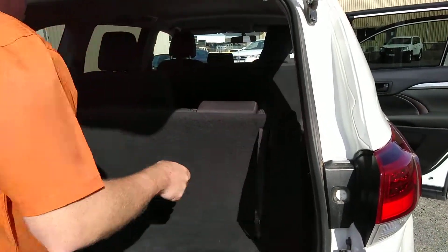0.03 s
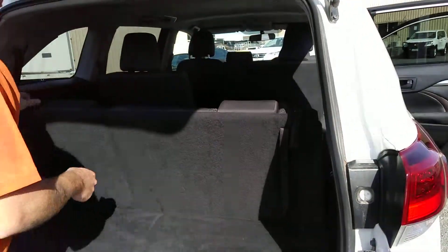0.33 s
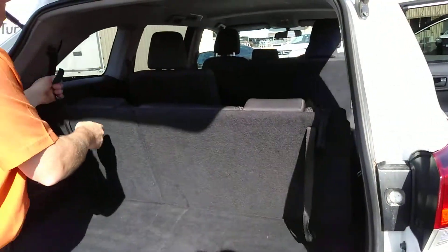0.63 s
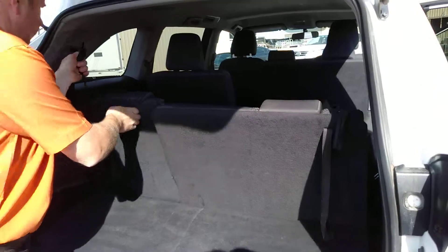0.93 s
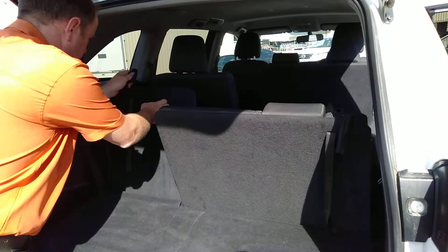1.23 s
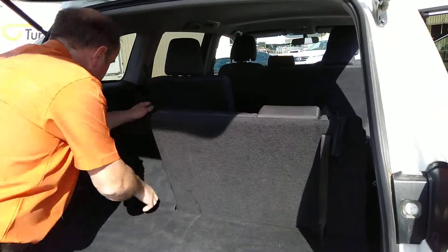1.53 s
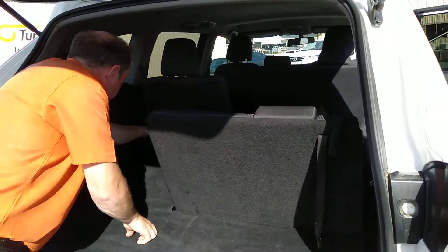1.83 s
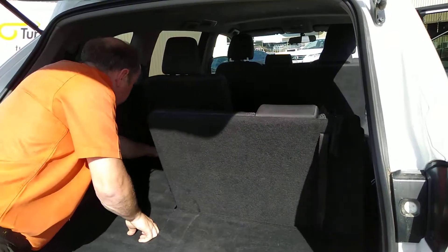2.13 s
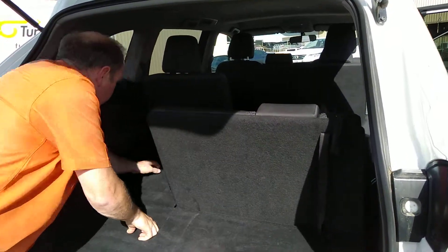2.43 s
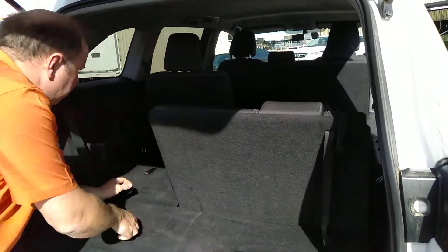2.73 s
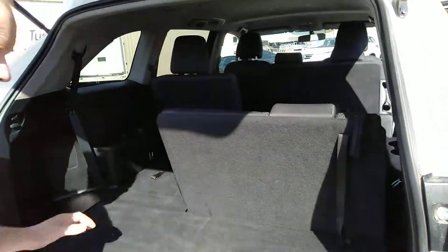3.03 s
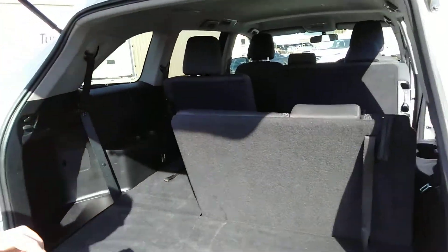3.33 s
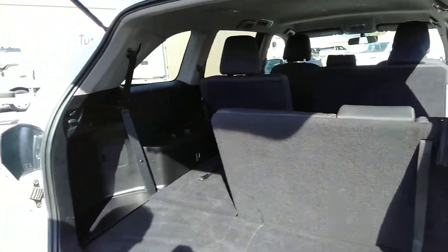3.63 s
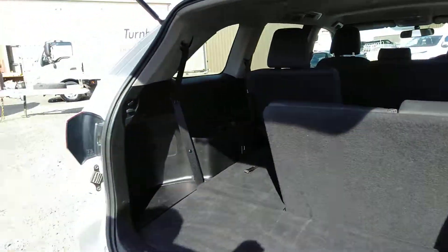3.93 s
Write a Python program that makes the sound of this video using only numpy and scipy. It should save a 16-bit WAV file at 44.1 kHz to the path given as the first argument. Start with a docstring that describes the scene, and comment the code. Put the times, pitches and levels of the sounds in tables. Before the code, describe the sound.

A folding car seat latches with one loud, close clunk about halfway through. Light plastic clicks come before and after, then soft rustles, a short scrape and a small rattle, over a faint distant idling engine and light wind.

```python
"""In the open back of a car parked outdoors, a folding seat latches with one loud clunk.
The catch touches, then clatters home: its impacts excite the modes of the seat frame, the padded
backrest thumps and the cabin reverberates briefly. Trim clicks and scrapes, cloth rustles and a
loose fitting rattles, over a distant idling engine and light wind."""
import sys
import numpy as np
from scipy import signal
from scipy.fft import rfft, irfft
from scipy.io import wavfile

SR = 44100
rng = np.random.default_rng(int(sys.argv[2]) if len(sys.argv) > 2 else 0)


def dump_mix(stems):
    """Bounce the given channels to the path in sys.argv[1] as a 16-bit WAV at rate SR."""
    frames = np.atleast_2d(stems).T  # one column per channel
    limited = np.clip(frames, -1, 1)  # hard clip at full scale
    pcm = np.round(limited * 32767).astype(np.int16)
    wavfile.write(sys.argv[1], SR, pcm)


N = 176400
PIVOT_HZ = 2000  # spectral tilts turn about this frequency
# Spectrum of rough contact. Each row: frequency in Hz, relative level in dB.
CONTACT_SPECTRUM = [(150, -10), (600, -0.5), (1500, 3.5), (2500, 3), (4800, -12.5), (7300, -6.5),
                    (10000, -24.5), (16000, -15)]


def amp(db):
    """Decibels as an amplitude ratio."""
    return 10 ** (np.asarray(db) / 20)


def unit(x):
    """Normalisation to unit RMS."""
    return x / np.sqrt(np.mean(x ** 2) + 1e-20)


def read(points, hz):
    """Interpolation along a logarithmic frequency axis."""
    f, value = np.transpose(points)
    return np.interp(np.log(hz + 1), np.log(f + 1), value)


def add(mix, start, sound):
    """Superposition of a sound on the mix, from a start in seconds."""
    part = mix[max(round(start * SR), 0):][:len(sound)]
    part += sound[:len(part)]


def fade(t, t60):
    """Exponential decay, by 60 dB in t60 seconds."""
    return np.exp(-np.log(1000) * t / t60)


def bell(offset, width):
    """A Gaussian curve; the width is its standard deviation."""
    return np.exp(-(offset / width) ** 2 / 2)


def colour(x, points, tilt=0):
    """Minimum-phase filtering at unit energy, tilted in dB per octave above 1400 Hz."""
    size = 4096
    hz = abs(np.fft.fftfreq(size, 1 / SR))
    gain = unit(amp(read(points, hz) + tilt * np.log2(np.maximum(hz, 1400) / PIVOT_HZ)))
    log_response = signal.hilbert(np.log(gain + 1e-6)).conj()
    taps = np.fft.ifft(np.exp(log_response)).real
    return signal.fftconvolve(x, taps[:size // 2])[:len(x)]


def resonant(points, centre_hz, low_cut, peak_db=5.5):
    """A broad resonance laid over a spectrum, with a cut in dB per octave below its centre."""
    hz = np.geomspace(50, SR / 2, 120)
    octaves = np.log2(hz / centre_hz)
    peak = peak_db * bell(octaves, width=0.44)
    return np.c_[hz, read(points, hz) + peak + low_cut * np.minimum(octaves, 0)]


def drift(rate_hz):
    """Random motion: low-passed noise of unit RMS."""
    hz = np.fft.rfftfreq(N, 1 / SR)
    return unit(irfft(rfft(rng.standard_normal(N)) / (1 + (hz / rate_hz) ** 4), N))


def burst(decay_s):
    """An impact's broadband transient: decaying noise of unit energy."""
    t = np.arange(SR // 4) / SR
    x = rng.standard_normal(len(t)) * fade(t, decay_s)
    for _ in range(2):
        whitened = irfft(np.exp(1j * np.angle(rfft(x))), len(t))
        x = whitened * fade(t, 2 * decay_s)
    return x / np.linalg.norm(x)


def wavering(hz, rate_hz=2.71, depth_db=2, deviation_hz=1.525):
    """A tone of unit RMS under random amplitude and frequency modulation."""
    strength = amp(depth_db * drift(rate_hz))
    pitch = hz + deviation_hz * drift(rate_hz)
    return unit(strength * np.sin(2 * np.pi * np.cumsum(pitch) / SR))


def outdoors(split_hz=250):
    """Broadband ambient noise, with the low pressure fluctuations of wind puffs."""
    # Each row: frequency in Hz, relative spectral density in dB.
    spectrum = [(12, -53), (20, -7), (49, -9.5), (88, -0.5), (145, -10.5), (167, -16), (221, -17),
                (355, -24.5), (456, -21), (554, -26), (603, -27), (843, -26), (916, -23), (1080, -26.5),
                (2000, -29), (4760, -46), (7030, -43), (9040, -51), (15800, -47)]
    # Each row: time in seconds, gain above the bass in dB.
    swell = [(0, -.5), (.8, 2), (1.4, 0.94), (2, -.5), (2.8, -0.5), (3.5, -0.5), (4, 1)]
    # Each row: middle in seconds, width in seconds, level in dB.
    puffs = [(0.03, .05, -52), (1.007, 0.069, -45), (1.44, 0.0079, -36), (1.52, 0.054, -53),
             (2.307, 0.14, -56)]
    t, hz = np.arange(N) / SR, np.fft.rfftfreq(N, 1 / SR)
    air = unit(irfft(rfft(rng.standard_normal(N)) * amp(read(spectrum, hz)), N))
    bass = irfft(rfft(air) * (hz < split_hz), N)
    hiss = (air - bass) * amp(np.interp(t, *np.transpose(swell)))
    wind = drift(rate_hz=60) * sum(amp(db) * bell(t - middle, width) for middle, width, db in puffs)
    return amp(-50.5) * (bass + hiss) + wind


def engine(fan_hz=936):
    """Rotation gives a line spectrum: a distant idling engine hums and its fan's whine comes and goes."""
    # Each row: frequency in Hz, level in dB.
    hum_lines = [(70, -63.5), (82, -59.5), (94, -55), (123, -60.5), (140, -61), (233, -69.5),
                 (398.4, -71.5), (467, -68.5), (598, -72.5), (699, -75.5), (907, -74.5), (945, -74.5),
                 (1005, -81.5)]
    # Each row: time in seconds, level in dB.
    whine_levels = [(0, -65), (.8, -69), (1.7, -72.5), (1.9, -62), (2.15, -68), (3.2, -68.5), (4, -64.5)]
    hum = sum(amp(db) * wavering(hz) for hz, db in hum_lines)
    whine_db = np.interp(np.arange(N) / SR, *np.transpose(whine_levels))
    return hum + amp(whine_db) * wavering(fan_hz)


def scuffs(grains_per_s=3200):
    """Sliding friction: swells of tiny random impulses merge into scuffs and cloth rustles."""
    # Each row: middle in seconds, width in seconds, level in dB, tilt in dB per octave, resonance in Hz.
    rubs = [(0.194, 0.0044, -53, 0, 3200), (0.394, 0.0092, -56.5, -1.5, 5500), (0.798, 0.04, -65, 4, 6100),
            (0.706, 0.061, -72, 8, 2180), (1.72, 0.016, -67, 6, 7060), (2.193, 0.0085, -53, -3.5, 1200),
            (3.194, 0.023, -50.5, 1, 1940), (3.265, 0.027, -58, -0.5, 1400), (3.325, 0.011, -56.5, 2, 4560),
            (3.751, 0.035, -54.5, -4, 3300), (3.821, 0.015, -57, -1, 3020), (3.886, 0.022, -62, -1, 3400),
            (3.930, 0.0034, -50.5, 2.5, 7200), (3.948, 0.019, -58, -1.5, 4500)]
    t, out = np.arange(N) / SR, np.zeros(N)
    for middle, width, db, tilt, hz in rubs:
        grains = rng.standard_normal(N) * (rng.random(N) < grains_per_s / SR)
        grains *= amp(-0.5 * np.minimum(rng.exponential(1, N), 3))
        spectrum = resonant(CONTACT_SPECTRUM, hz, low_cut=-0.5)
        out += amp(db) * colour(unit(grains) * bell(t - middle, width), spectrum, tilt)
    return out


def scrape(catches_per_s=1100, spread_db=4, release_s=.001):
    """Stick-slip friction: uneven catches of the trim drive the resonances of a plastic panel."""
    # Each row: start in seconds, length in seconds, level in dB.
    slips = [(3.7605, 0.0028, -41.5), (3.7745, 0.016, -47), (3.806, 0.011, -55)]
    # Each row: frequency in Hz, bandwidth in Hz, relative level in dB.
    panel_modes = [(1150, 270, 0), (1600, 260, 4.5), (2190, 380, 4), (3200, 1200, -16)]
    t, out = np.arange(SR // 8) / SR, np.zeros(N)
    for start, length, db in slips:
        travel = np.cumsum(rng.exponential(1, len(t)) ** 2 / 2) * catches_per_s / SR
        catches = np.diff(np.floor(travel), prepend=-1)
        catches *= amp(spread_db * rng.uniform(-0.9, 1, len(t))) * rng.choice([-1, 1], len(t))
        catches *= np.clip((length - t) / release_s, 0, 1)
        ring = np.zeros(len(t))
        for hz, width, level in panel_modes:
            band = signal.butter(2, [hz - width / 2, hz + width / 2], "band", fs=SR)
            ring += amp(level) * signal.lfilter(*band, catches)
        add(out, start, amp(db) * np.sqrt(length * SR) * ring / np.linalg.norm(ring))
    return out


def rattle():
    """Repeated impact: each bounce of a loose fitting knocks and excites its damped modes."""
    # Each row: start in seconds, gain in dB.
    bounces = [(3.927, -2.5), (3.9315, -10), (3.9392, 3), (3.948, -2), (3.953, -8)]
    # Each row: frequency in Hz, level in dB, T60 in seconds.
    fitting_modes = [(750, -51, .04), (930, -51, .03), (1640, -50, .035), (3130, -48.5, .04),
                     (4390, -56, .05), (6650, -62, .04), (6990, -60, .04), (7600, -62, .04)]
    t, out = np.arange(SR // 4) / SR, np.zeros(N)
    for start, db in bounces:
        ring = sum(amp(level) * fade(t, t60) * np.sin(2 * np.pi * (hz * t + rng.random()))
                   for hz, level, t60 in fitting_modes)
        knock = amp(-25.5) * colour(burst(decay_s=.022), CONTACT_SPECTRUM, tilt=-3)
        add(out, start, amp(db) * (ring + knock))
    return out


def clicks():
    """Impulse response of plastic trim: a sharp tick and a short, heavily damped ring."""
    # Each row: start in seconds, level in dB, tilt in dB per octave, resonance in Hz,
    # ring relative to the tick in dB, cut below the resonance in dB per octave.
    taps = [(0.1735, -16.5, -1, 3230, -8, 3.5), (.3415, -28, 6, 1600, -6, -1.5),
            (0.656, -27.5, 0, 2340, 0, 6), (0.668, -34.5, 1.5, 1900, 7, -3), (0.7208, -37, -6, 2000, 7, 5),
            (1.055, -36.5, 3, 1700, 5, -2.5), (1.415, -36, 1, 2500, -1, -1), (1.452, -44.5, 4, 7200, 5, 7),
            (1.808, -41, 11, 3000, -4, 1), (2.1984, -25, -8, 1200, 2, 6), (2.513, -35.5, -1, 3000, -9, 8),
            (2.5762, -37, -1, 3020, -1, 7), (2.616, -41, 6, 3500, -8, 7), (2.744, -37.5, 0, 2600, 3, -1),
            (2.902, -28.5, 3, 2000, -3.5, -1.5), (2.943, -40.5, 19, 14000, -1, -6),
            (3.1072, -26.5, -5, 1550, -8, -0.5), (3.2028, -20, -10, 1870, 1.5, 2),
            (3.2073, -22, -9, 940, 3, 2), (3.2643, -25, -5.5, 1390, -1, 0),
            (3.3122, -26.5, -4, 1380, -3, 4), (3.356, -30.5, -6, 2040, -1, 1),
            (3.891, -29, -7, 2570, -1, 4.5)]
    # Each row: frequency in Hz, relative level in dB.
    trim_spectrum = [(150, 1.5), (600, 7), (1500, 3.5), (2800, 3), (4800, -9.5), (7200, -9.5),
                     (10000, -23.5), (16000, -47)]
    out = np.zeros(N)
    for start, db, tilt, hz, ring_db, low_cut in taps:
        tick = burst(decay_s=.0026) + amp(ring_db) * burst(decay_s=.036)
        add(out, start, amp(db) * colour(tick, resonant(trim_spectrum, hz, low_cut), tilt))
    return out


def cabin(x, build_up_s=.0084, gain_db=-12.5):
    """Reverberation: reflections build up and are soon absorbed by the padded interior."""
    # Each row: frequency in Hz, T60 in seconds.
    reverb_times = [(150, 0.35), (500, 0.11), (900, .07), (1800, 0.13), (7000, 0.1), (15000, 0.06)]
    hz, t, noise = signal.stft(rng.standard_normal(SR // 2), SR, nperseg=256)
    tail = signal.istft(noise * fade(t, read(reverb_times, hz)[:, None]), SR)[1]
    tail *= np.minimum(np.arange(len(tail)) / SR / build_up_s, 1) ** 2
    return amp(gain_db) * signal.fftconvolve(x, tail / np.linalg.norm(tail))[:N]


def backrest(rise_s=.008):
    """Cushioned impact: low resonances of the padded backrest swell and die."""
    # Each row: start in seconds, frequency in Hz, level in dB, T60 in seconds.
    thumps = [(2.190, 140, -44, .1), (2.2320, 228, -36.5, .11), (2.2410, 108, -36, .09),
              (2.2440, 180, -35.5, .11), (2.367, 85, -35, .03)]
    t, out = np.arange(SR // 2) / SR, np.zeros(N)
    for start, hz, db, t60 in thumps:
        envelope = np.minimum(t / rise_s, 1) * fade(np.maximum(t - rise_s, 0), t60)
        add(out, start, amp(db) * envelope * np.sin(2 * np.pi * hz * t))
    return out


def latch(crack_db=-7.3):
    """Modal excitation: each blow of the catch cracks and adds energy to the ringing frame and catch."""
    # Each row: start in seconds, gain in dB, tilt in dB per octave.
    blows = [(2.1925, -25, -5), (2.1983, -19, -6), (2.2337, -5, 0), (2.2367, 0, -.5), (2.2396, -.5, 0),
             (2.2420, 0, 0), (2.2455, -4, 1.5), (2.2515, -14, -2), (2.2555, -16, -3), (2.2780, -26, 1)]
    # Each row: frequency in Hz, relative level in dB.
    crack_spectrum = [(150, -26), (330, -6), (520, -10), (780, -1), (1080, 0), (1600, -5), (1850, -4.5),
                      (2750, -5), (3550, -8), (4200, -12), (5000, -19), (7200, -15), (8800, -21),
                      (9800, -27), (14000, -32), (15600, -25)]
    # Seat frame and steel catch. Each row: frequency in Hz, level in dB, T60 in seconds.
    frame_modes = [(420, -48.5, .13), (500, -44.5, .11), (590, -45, .045), (810, -38, .022),
                   (1003, -34, .028), (1153, -38, .04), (1314, -45, .07), (1560, -49, .08),
                   (1888, -42, .06), (2060, -47, .06), (2268, -45, .05), (2538, -48, .045),
                   (2760, -44, .035), (3046, -45, .04), (3226, -47, .04), (3440, -46, .035),
                   (3654, -46, .035)]
    catch_modes = [(4120, -50, .03), (5470, -60, .05), (6460, -61, .045), (6990, -58, .035),
                   (7480, -56, .035), (8285, -56, .04), (8890, -59, .035)]
    t, out = np.arange(SR // 2) / SR, np.zeros(N)
    for start, db, tilt in blows:
        add(out, start, amp(db + crack_db) * colour(burst(decay_s=.034), crack_spectrum, tilt))
    first_touch = blows[0][0]
    for hz, level, t60 in frame_modes + catch_modes:
        energy = np.zeros(len(t))
        for start, db, tilt in blows:
            strength = amp(db + tilt * np.log2(hz / PIVOT_HZ))
            add(energy, start - first_touch, (strength * fade(t, t60)) ** 2)
        tone = np.sin(2 * np.pi * (hz * t + rng.random()))
        add(out, first_touch, amp(level) * np.sqrt(energy) * tone)
    return out


def scene():
    """Superposition of all sources in one channel; only the latch and clicks reverberate."""
    hard = latch() + clicks()
    return (hard + cabin(hard) + backrest() + scuffs() + scrape() + rattle() + outdoors() + engine())[None]


def record(dry, cutoff_hz=15900):
    """Band limiting by a linear-phase low-pass filter."""
    taps = signal.firwin(511, cutoff_hz, window=("kaiser", 9), fs=SR)
    return signal.oaconvolve(dry, taps[None], "same")


dry = scene()
out = record(dry)
dump_mix(out)
```